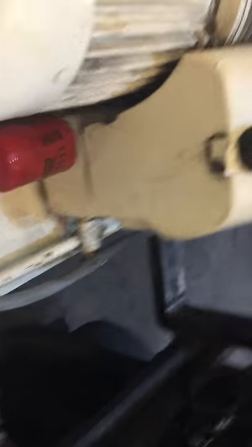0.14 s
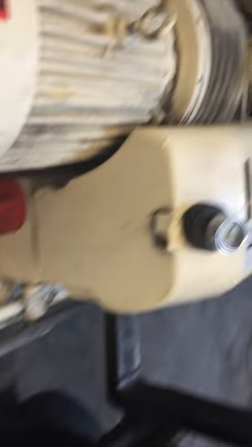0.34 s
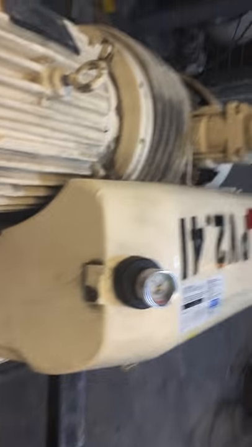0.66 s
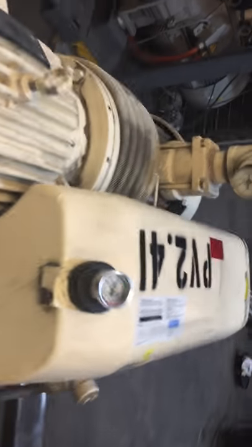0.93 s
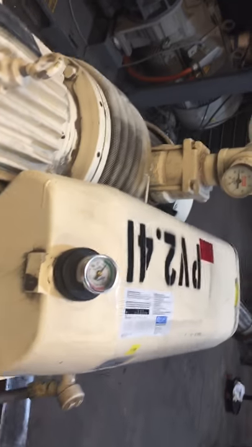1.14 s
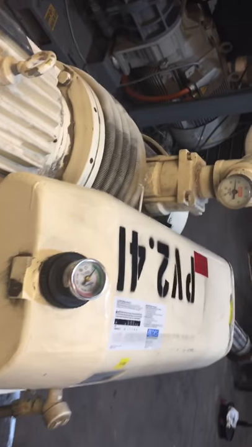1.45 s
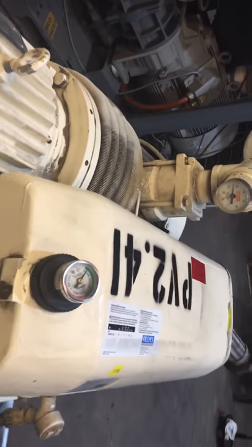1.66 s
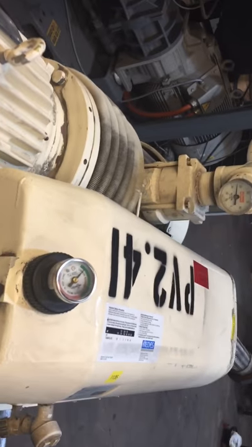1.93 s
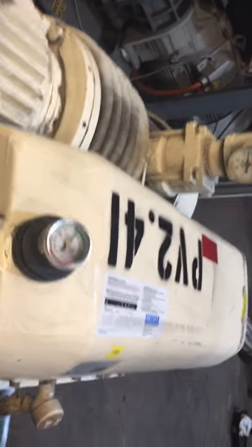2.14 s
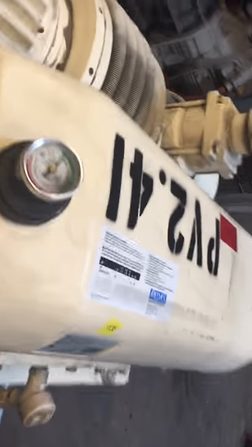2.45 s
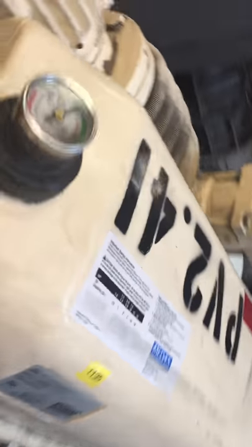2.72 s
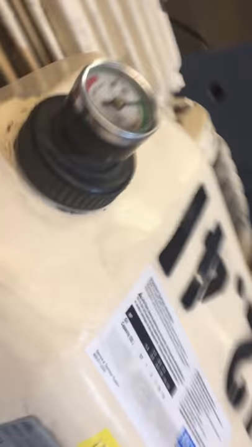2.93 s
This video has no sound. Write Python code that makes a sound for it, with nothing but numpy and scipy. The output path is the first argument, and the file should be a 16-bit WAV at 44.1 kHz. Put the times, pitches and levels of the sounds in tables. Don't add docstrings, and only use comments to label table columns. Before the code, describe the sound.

Loud industrial vacuum pump hums and roars without pause, its casing ringing with a high whine

```python
import sys
import numpy as np
from scipy import signal
from scipy.fft import rfft, irfft, next_fast_len
from scipy.io import wavfile
from scipy.ndimage import uniform_filter1d, map_coordinates

SR = 44100
rng = np.random.default_rng(int(sys.argv[2]) if len(sys.argv) > 2 else 0)


def output_pcm(signal):
    pcm = np.clip(np.atleast_2d(signal).T, -1, 1) * 32767
    wavfile.write(sys.argv[1], SR, np.round(pcm).astype(np.int16))


def undo_db(level):
    steps = np.asarray(level, float) / 20
    return 10 ** steps


N = 136269
STEP = 32

SHAFT_HZ = 29.2275
VANES = 3

# [t/s, place (0 motor, .5 beside it, 1 a step back, 2 tank), extra distance/m]
CAMERA_PATH = [(.15, 0.025, -0.017), (.35, 0.45, -0.019), (.6, 0.66, 0.0045), (.9, 0.77, 0.049),
               (1.2, 1.02, 0.075), (1.6, 1.01, 0.1), (2.0, 1.06, 0.079), (2.4, 1.22, 0.059),
               (2.67, 1.76, -0.022), (2.9, 1.86, -0.084), (3.09, 1.97, -0.15)]
PLACES = {3: (0, 1, 2), 4: (0, .5, 1, 2), 5: (0, .5, 1, 1.6, 2)}
# [shaft order, level/dB at each place from motor to tank]
VANE_ORDERS = [(6, -59, -52, -45.5, -35), (9, -47, -34.5, -29, -22.5), (12, -22, -25, -30, -28, -24.5),
               (15, -30, -35.5, -38, -26, -22), (18, -31.5, -28, -36, -38, -21),
               (21, -30, -31.5, -25, -24.5), (24, -30, -31.5, -39, -44), (27, -27, -31.5, -30, -35),
               (30, -22.5, -20.5, -26.5, -28), (33, -31, -30, -29.5, -29.5), (36, -31, -30.5, -31.5, -31),
               (39, -29, -29.5, -33, -45), (42, -25, -18.5, -17, -21.5, -28.5), (44.5, -46, -38, -35, -35),
               (47.5, -49, -57, -48, -54), (51.5, -49, -47, -64, -52), (54, -44, -33, -39.5, -34.5),
               (57, -36, -32, -41, -28.5), (60, -49, -34, -49, -33), (63, -37, -39, -47, -39)]
# [shaft order, level/dB at each place from motor to tank]
ROTOR_ORDERS = [(8, -33, -37, -35, -33), (11, -39, -43, -37, -51), (22, -38, -39, -43, -37),
                (26, -52, -41, -39, -46), (29, -36, -38, -39, -37), (31, -28, -30, -38, -31, -46),
                (32, -36, -43, -37, -33), (34, -31, -34, -42, -35), (44, -39, -42, -35, -39),
                (52, -44, -40, -44, -41)]
# [shaft order, level/dB]
PLAIN_ORDERS = [(7, -41), (10, -43), (13, -44), (16, -52), (17, -42), (20, -47), (23, -43), (28, -41),
                (35, -41), (37, -43), (40, -41), (43, -41), (46, -43), (47, -41), (53, -44), (56, -42),
                (58, -44), (59, -43), (62, -47), (64, -51), (66, -45), (69, -46), (73, -47), (75, -46),
                (78, -47), (84, -48), (107, -45), (108, -49)]
# [f/Hz, level/dB]
WEAK_ORDERS = [(50, -51.5), (400, -47.5), (1100, -46), (1700, -55), (2300, -51.5), (3100, -56.5),
               (3500, -50.5)]
# [f/Hz, level/dB per Hz]
ROAR_MOTOR = [(30, -79), (70, -64), (170, -53.5), (550, -52.5), (1150, -53), (1900, -56), (3500, -68.5),
              (15500, -140)]
ROAR_BACK = [(30, -91), (70, -60.5), (170, -53.5), (550, -60), (1150, -53), (1900, -65), (3500, -67),
             (15500, -140)]
ROAR_TANK = [(30, -76), (70, -55.5), (170, -51), (550, -55.5), (1150, -51), (1900, -56.5), (3500, -67.5),
             (15500, -140)]
# [f/Hz, level/dB per Hz]
OIL_SPRAY = [(2000, -71), (3500, -73), (5000, -66), (7500, -68.5), (10000, -73), (11000, -75.5),
             (14000, -76), (15700, -78.5)]
# [f/Hz, width/Hz, level/dB at each place from motor to tank]
CASING = [(3783, 150, -37, -38.5, -36), (4233, 150, -29, -35.5, -35.5, -33.5, -33),
          (4582, 250, -43, -37.5, -35), (5172, 118, -41, -40, -38.5, -31, -39),
          (5368, 190, -37.5, -37, -40), (6533, 370, -38, -37, -34), (7135, 120, -39, -39, -39),
          (8900, 500, -41, -44.5, -44), (9880, 170, -48, -48.5, -43), (10320, 120, -52, -50, -50),
          (10500, 300, -51, -46, -45), (12600, 300, -52, -52, -48)]
# [t/s, centre f/Hz, level/dB]
RING_LOW = [(0.1, 4100, -25.5), (0.19, 4060, -26), (0.27, 4060, -22.5), (0.29, 4080, -27),
            (0.32, 4040, -21.5), (0.36, 4090, -33), (0.37, 4055, -28.5), (1.3, 4044, -27),
            (1.36, 4090, -37), (1.4, 4060, -28.5), (1.81, 4060, -29), (1.82, 4080, -30.5),
            (2.44, 4104, -29), (2.81, 4110, -37), (2.82, 4040, -30), (3.09, 4090, -28)]
RING_MID = [(0.1, 6320, -38), (0.54, 6250, -29.5), (0.85, 6320, -42), (0.94, 6250, -35), (1.6, 6340, -36),
            (1.61, 6290, -30), (1.7, 6290, -38), (2.07, 6280, -32), (2.41, 6290, -38), (2.86, 6300, -31),
            (3.09, 6370, -35)]
RING_HIGH = [
    (0.1, 8040, -47),
    (0.12, 8050, -45),
    (0.62, 8040, -46),
    (0.67, 8060, -37),
    (1.76, 8050, -45),
    (1.78, 8000, -48),
    (2.75, 8030, -37),
    (2.91, 8030, -47),
    (3.06, 8000, -37),
    (3.09, 8040, -43),
]
# [t/s, f/Hz, level/dB]
WHINE = [(0.1, 10486, -47), (0.28, 10477, -54), (0.5, 10476, -40.5), (0.67, 10471, -48),
         (0.89, 10476, -40.5), (1.66, 10477, -37.5), (2.16, 10479, -46), (2.31, 10540, -39),
         (2.36, 10471, -51), (2.74, 10486, -43), (2.76, 10475, -51), (3.09, 10481, -40)]
# [t/s, low f/Hz, high f/Hz, level/dB]
SPLITS = [
    (1.347, 13000, 14600, -47),
    (1.44, 11000, 12600, -46),
    (1.509, 8900, 10500, -39),
    (1.881, 13800, 15300, -47),
    (1.881, 4100, 5300, -33),
    (2.09, 12300, 14600, -44),
    (2.09, 4600, 5900, -33),
    (2.113, 11700, 13200, -45),
    (2.183, 11000, 13300, -42),
    (2.183, 8900, 10500, -40),
]
# [t/s, peak level/dB, length/s]
PUFFS = [
    (2.908, -26, 0.0027),
    (2.952, -29, .004),
    (3.049, -35, .004),
]


def unit(x):
    return x / np.sqrt(np.mean(x ** 2) + 1e-20)


def along(points, hz):
    f, value = np.transpose(points)
    return np.interp(np.log(hz + 1), np.log(f + 1), value)


def slowly(rate):
    knots = rng.standard_normal(int(N * rate / SR) + 4)
    return map_coordinates(knots, [np.arange(0, N, STEP) * rate / SR])


def full(coarse):
    return np.interp(np.arange(N), np.arange(0, N, STEP), coarse)


def wobble(rate):
    return full(slowly(rate))


def filtered(x, response):
    size = next_fast_len(N + 8192)
    gain = response(np.fft.rfftfreq(size, 1 / SR))
    return irfft(rfft(x, size) * gain, size)[..., :N]


def patchy(patchy_db):
    z = signal.stft(rng.standard_normal(N), nperseg=512)[2]
    field = uniform_filter1d(rng.standard_normal(z.shape), size=5, axis=0)
    field = uniform_filter1d(field, size=16, axis=1)
    noise = signal.istft(z * undo_db(patchy_db * unit(field)), nperseg=512)[1][:N]
    return unit(noise) * np.sqrt(SR / 2)


def walk():
    s, place, metres = np.transpose(CAMERA_PATH)
    t = np.arange(N) / SR
    return [uniform_filter1d(np.interp(t, s, v), size=4410) for v in (place, metres)]


def here(place, values):
    return np.interp(place, PLACES[len(values)], values)


def order_phase(k):
    offset = k if k % VANES else k - np.clip(k, 9, 18)
    phase = np.pi * (1.5 + 0.14 * offset ** 2)
    if k % VANES:
        phase = phase + 0.5 * wobble(3.02)
    return phase


def orders(place, metres):
    jitter_rad, scatter_db = .002, 1.5
    drift_db, shimmer_db, weak_drift_db = .4, .7, 2.8
    heard_at = np.arange(N) / SR - metres / 343
    turn = 2 * np.pi * SHAFT_HZ * heard_at + jitter_rad * wobble(25)
    strong = {round(k): levels for k, *levels in [*VANE_ORDERS, *ROTOR_ORDERS]}
    plain = {round(k): db for k, db in PLAIN_ORDERS}
    out = np.zeros(N)
    for k in range(2, 120):
        slow = slowly(1.89)
        if k in strong:
            db = here(place[::STEP], strong[k]) + drift_db * slow + shimmer_db * slowly(14)
        else:
            weak_db = along(WEAK_ORDERS, k * SHAFT_HZ) + scatter_db * rng.standard_normal()
            db = plain.get(k, weak_db) + weak_drift_db * slow
        out += full(undo_db(db)) * np.sin(k * turn + order_phase(k))
    return np.sqrt(2) * out


def roar(place):
    pulse_depth = .2
    vane_turn = 2 * np.pi * VANES * SHAFT_HZ * np.arange(N) / SR
    air = patchy(patchy_db=1.5) * (1 - pulse_depth * np.cos(vane_turn))
    out = np.zeros(N)
    for share, colour in zip(np.eye(3), (ROAR_MOTOR, ROAR_BACK, ROAR_TANK)):
        view = filtered(air, lambda hz: undo_db(along(colour, hz)))
        out += here(place, share) * view
    return out


def casing(place):
    drift_db, flutter_db = .8, 1.2
    out = filtered(patchy(patchy_db=2.0), lambda hz: undo_db(along(OIL_SPRAY, hz)))
    for hz, width_hz, *levels in CASING:
        ring = filtered(rng.standard_normal(N), lambda f: 1 / (1 + (2 * (f - hz) / width_hz) ** 2))
        db = here(place[::STEP], levels) + drift_db * slowly(2.59) + flutter_db * slowly(45)
        out = out + unit(ring) * full(undo_db(db))
    return out


def rings():
    t, out = np.arange(N) / SR, np.zeros(N)
    widths_hz, trims_db = (122, 130, 60), (0.5, -0.5, -1)
    for curve, width_hz, trim_db in zip((RING_LOW, RING_MID, RING_HIGH), widths_hz, trims_db):
        s, hz, db = np.transpose(curve)
        turn = 2 * np.pi * np.cumsum(np.interp(t, s, hz)) / SR
        a, b = filtered(rng.standard_normal((2, N)), lambda f: 1 / (1 + (2 * f / width_hz) ** 2))
        ring = unit(a * np.cos(turn) + b * np.sin(turn))
        out += ring * undo_db(np.interp(t, s, db) + trim_db)
    return out


def whine():
    wander_hz, flutter_db, trim_db = 7, 1.8, -1.5
    s, hz, db = np.transpose(WHINE)
    t = np.arange(N) / SR
    pitch = np.interp(t, s, hz) + wander_hz * wobble(60.1)
    tone = np.sin(2 * np.pi * np.cumsum(pitch) / SR)
    level_db = np.interp(t, s, db) + trim_db + flutter_db * wobble(14)
    return np.sqrt(2) * tone * undo_db(level_db)


def splits():
    length_s = .046
    t, out = np.arange(N) / SR, np.zeros(N)
    for s, low_hz, high_hz, db in SPLITS:
        band = filtered(rng.standard_normal(N), lambda hz: (hz > low_hz) & (hz < high_hz))
        swell = np.cos(np.pi * np.clip((t - s) / length_s, -.5, .5)) ** 2
        out += undo_db(db) * unit(band) * swell
    return np.array([out, -out])


def puffs():
    t, out = np.arange(N) / SR, np.zeros(N)
    for s, db, length in PUFFS:
        u = (t - s) / length
        out += undo_db(db) * 1.7 * u * np.exp(-u ** 2 / 2)
    return out


def scene():
    place, metres = walk()
    mono = orders(place, metres) + roar(place) + casing(place) + rings() + whine() + puffs()
    return np.array([mono, mono])


def low_pass(x):
    return signal.sosfilt(signal.butter(12, 17030, fs=SR, output="sos"), x)


def record(dry):
    low_cut_hz, top_hz = 35, 15740
    start_s, fade_s = .0841, 0.00018
    x = filtered(dry, lambda hz: (hz < top_hz) * hz ** 2 / (hz ** 2 + low_cut_hz ** 2))
    x = x * np.clip((np.arange(N) / SR - start_s) / fade_s, 0, 1)
    return low_pass(x + splits())


dry = scene()
out = record(dry)
output_pcm(out)
```